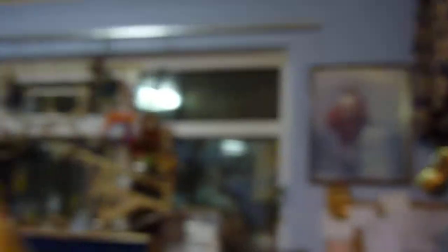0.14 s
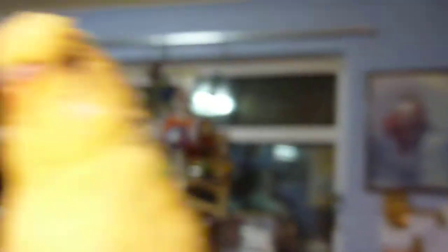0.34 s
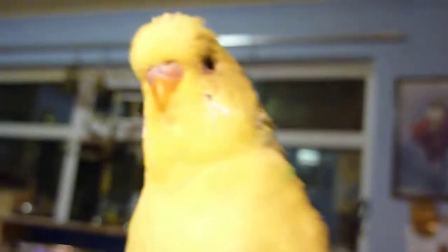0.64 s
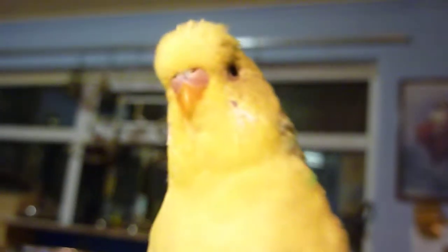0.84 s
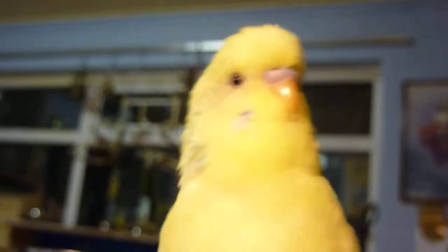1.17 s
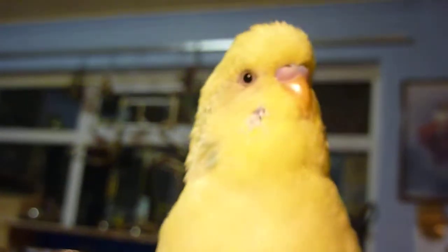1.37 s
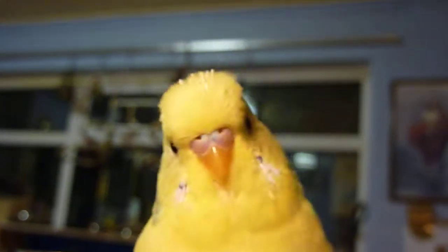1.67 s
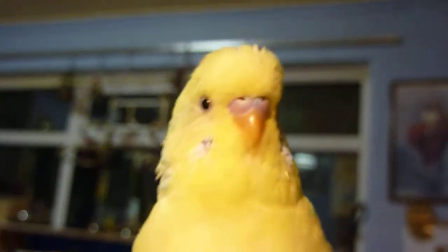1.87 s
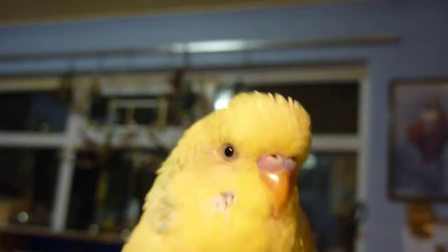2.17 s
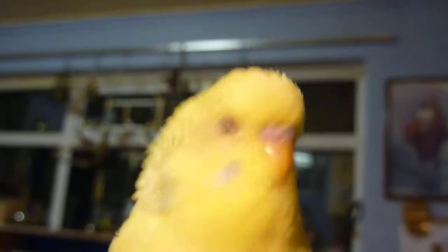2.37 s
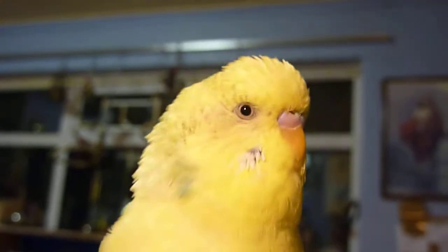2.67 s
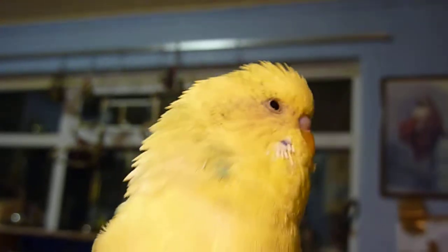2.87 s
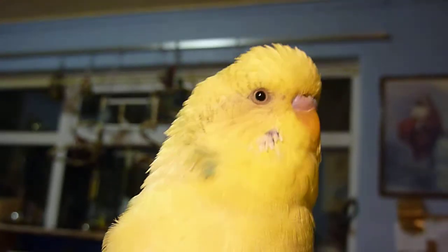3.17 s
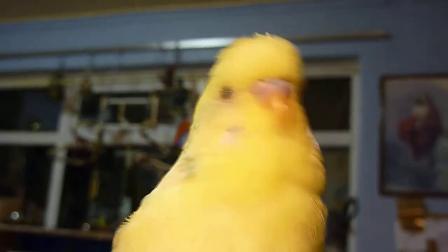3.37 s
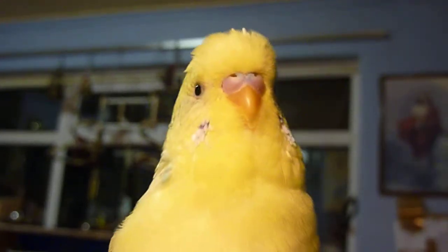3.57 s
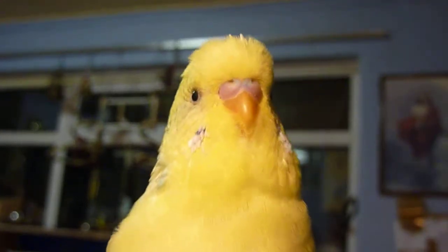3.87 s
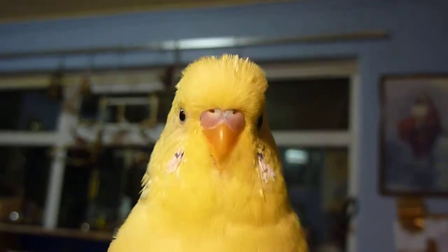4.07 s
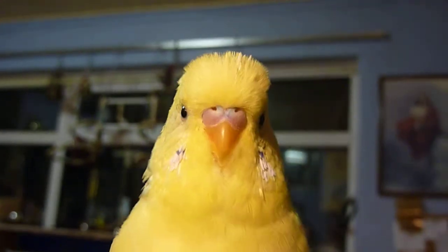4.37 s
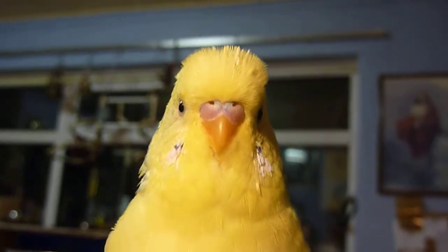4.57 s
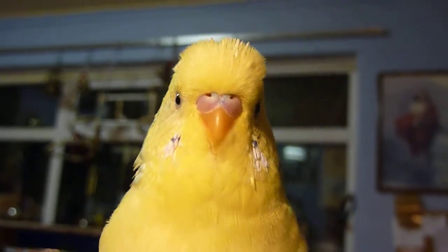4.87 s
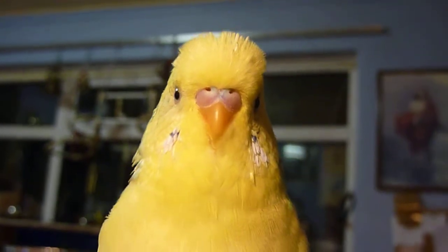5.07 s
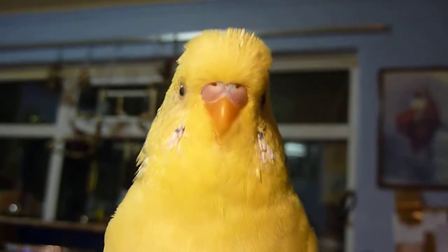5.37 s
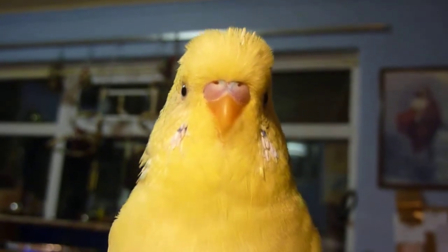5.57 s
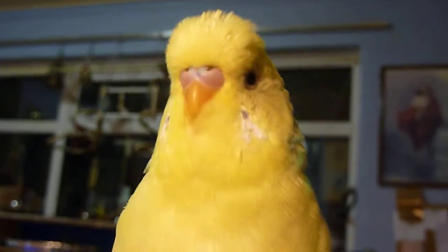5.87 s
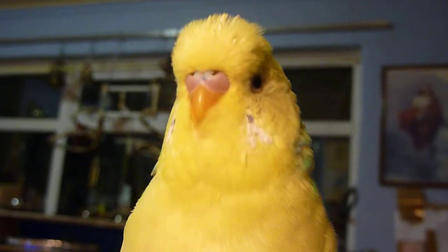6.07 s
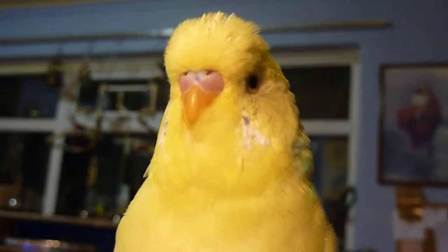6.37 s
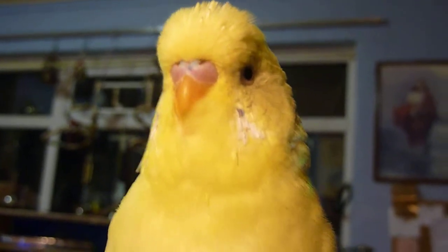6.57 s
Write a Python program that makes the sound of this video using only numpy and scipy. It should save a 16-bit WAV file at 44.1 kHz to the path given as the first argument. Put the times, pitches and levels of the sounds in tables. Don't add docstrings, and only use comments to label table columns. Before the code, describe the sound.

A small pet parrot close to the microphone clicks its beak, gives one brief raspy chirrup, then snaps in a steady run over faint hum.

```python
import sys
import numpy as np
from scipy import signal
from scipy.fft import rfft, irfft
from scipy.io import wavfile
from scipy.ndimage import uniform_filter1d, map_coordinates

SR = 44100
rng = np.random.default_rng(int(sys.argv[2]) if len(sys.argv) > 2 else 0)


def digitize_waveform(pressure):
    field = np.atleast_2d(pressure).T
    bounded = np.clip(field, -1, 1)
    quanta = np.round(bounded * 32767).astype(np.int16)
    wavfile.write(sys.argv[1], SR, quanta)


def volts_from_db(level):
    exponent = np.asarray(level, float) / 20
    return 10 ** exponent


N = 296793
T = np.arange(N) / SR

# [t/s, left-port treble lead/dB, chest f/Hz, chest level/dB, horn edge level/dB]
POSTURES = [(0.705, 7.5, 850, -15, 5.5), (2.108, 7, 767, -7.5, 7), (2.704, 3.5, 900, -11.5, -4),
            (2.881, 3.5, 900, -14, -10), (3.869, 6, 654, -7.5, 35.5), (4.058, 7, 870, -13.5, 4),
            (4.216, 6, 827, -5.5, -4), (4.377, 7, 820, -7.5, -4), (4.531, 6.5, 1000, -17, -4.5),
            (4.701, 7.5, 908, -20, 1.5), (4.864, 7, 770, -21, -9), (5.032, 7, 760, -14.5, -1),
            (5.204, 8, 810, -14.5, 2.5), (5.375, 5.5, 910, -19, 3), (5.548, 7, 830, -17.5, -3),
            (5.725, 6.5, 630, -21.5, 3.5), (6.414, 9.5, 620, -5, 34.5), (6.599, 10, 971, -12, 29)]


def band(x, hz, width_hz):
    return signal.lfilter(*signal.iirpeak(hz, hz / width_hz, fs=SR), x)


def ring(t, hz, cycles, rise=0.3):
    return np.where(t < 0, np.exp(-(t * hz / rise) ** 2), np.exp(-np.abs(t) * hz / cycles))


def add(out, start_s, x):
    i = int(start_s * SR)
    out[i:i + len(x)] += x[:N - i]


def hum(wobble_db=1.5):
    # [t/s, f/Hz, rms level/dB]
    mains_line = [(0, 199.2, -51.5), (0.999, 197.7, -50), (2.5, 201.2, -51), (3.8, 200.3, -49),
                  (4.401, 198.6, -51.5), (4.701, 200.5, -57), (5.2, 200.1, -53), (6.002, 201.5, -52),
                  (6.73, 200.2, -48.5)]
    # [f/Hz, rms level/dB]
    steady_lines = [(68.2, -79), (100.2, -67), (102.35, -77), (134.3, -75), (136.4, -75), (204.7, -67),
                    (272.8, -61.5), (300.5, -65.5), (306.9, -72.5)]
    s, hz, db = np.transpose(mains_line)
    drift = np.repeat(rng.standard_normal(N // 3000 + 1), 3000)[:N]
    drift = uniform_filter1d(drift, 3000)
    phase = 2 * np.pi * np.cumsum(np.interp(T, s, hz)) / SR
    out = volts_from_db(np.interp(T, s, db) + wobble_db * drift) * np.sin(phase)
    start_phases = rng.uniform(0, 2 * np.pi, len(steady_lines))
    for (hz, db), start in zip(steady_lines, start_phases):
        out = out + volts_from_db(db) * np.sin(2 * np.pi * hz * T + start)
    return np.sqrt(2) * out


def air(level_db=-51):
    # [f/Hz, density level/dB per Hz]
    spectrum = [(25, -20.5), (60, -18.5), (130, -13.5), (240, 0), (310, -8.5), (371, -1.5), (533, -9),
                (700, -10), (1050, -16), (1710, -17.5), (1900, -22.5), (2760, -23), (5000, -31.5),
                (7500, -32.5)]
    # [f/Hz, likeness/0-1]
    likeness = [(60, 0.89), (120, 0.93), (250, 1), (500, 0.96), (1010, 0.82), (2060, 0.36), (4170, -0.1),
                (8460, 0)]
    # [f/Hz, left minus right level/dB]
    imbalance = [(60, -2), (100, 7), (180, -2.5), (310, -0.5), (540, 0.5), (940, 0.5), (1630, 4.5),
                 (2820, 4.0), (4880, 2.0), (8460, 1)]
    log_f = np.log(np.fft.rfftfreq(N, 1 / SR) + 1)

    def curve(table):
        hz, value = np.transpose(table)
        return np.interp(log_f, np.log(hz), value)

    db, lean = curve(spectrum), curve(imbalance)
    alike = np.clip(curve(likeness), 0, 1)
    shared, *own = rfft(rng.standard_normal((3, N)))
    mix = np.sqrt(alike) * shared + np.sqrt(1 - alike) * np.array(own)
    mix = mix / np.sqrt((1 + alike) / 2)
    out = irfft(mix * volts_from_db(db + np.array([lean, -lean]) / 2), N)
    out = signal.sosfiltfilt(signal.butter(16, 8750, fs=SR, output="sos"), out)
    return out * volts_from_db(level_db) / out.std()


def buzz(frame_hz=29.97):
    # [f/Hz, width/Hz, rms level/dB]
    bands = [(5030, 200, -93), (6000, 250, -94), (6720, 350, -86), (7290, 250, -88)]
    ticks = np.zeros(N)
    ticks[(np.arange(0.01, N / SR, 1 / frame_hz) * SR).astype(int)] = 1
    out = np.zeros(N)
    for hz, width_hz, db in bands:
        tone = band(band(ticks, hz, width_hz), hz, width_hz)
        out += volts_from_db(db) * tone / tone.std()
    return out


def strikes():
    # [t/s, peak level/dB, mouth f/Hz]
    lone_snaps = [(0.413, -43.5, 3000), (1.3085, -48, 1000), (1.3096, -48, 1000), (2.6925, -42, 2514),
                  (2.7535, -26, 2820), (2.7726, -32, 2430), (2.8385, -43, 3550), (2.863, -47, 3480),
                  (2.8847, -17.5, 2200), (3.8752, -35, 800), (4.0592, -21.5, 2030), (4.3822, -30, 1200),
                  (4.5363, -25, 1100), (4.6974, -22, 2530), (4.8608, -18, 2730), (5.0294, -30, 1390),
                  (5.2007, -25.5, 2300), (5.2064, -28, 2810), (5.3722, -16, 3100), (5.3735, -26.5, 3700),
                  (5.5448, -18.5, 2820), (5.7297, -27.5, 2200)]
    # [middle snap t/s, peak level/dB, mouth f/Hz, gap/ms, lean/dB (+ loud first, - loud last)]
    triple_snaps = [(0.70581, -19, 3340, 1.2, -2), (2.108, -27, 3100, 1.74, -9),
                    (2.8829, -17.5, 2730, 1.41, 8.5), (2.8905, -22, 2700, 1.04, 3),
                    (3.8692, -32, 1102, 1.7, -5.5), (4.0611, -14.5, 3100, 1.1, 0.5),
                    (4.2184, -23.5, 2780, 1.6, 0.5), (4.378, -19.5, 3250, 1.0, -4),
                    (4.53201, -17, 3200, 1.138, 1.5), (4.70211, -15, 3250, 1.3, 2.5),
                    (4.8656, -15, 3100, 1.2, 4.5), (5.03331, -19, 2800, 1.273, -3.5),
                    (5.20461, -19.5, 2480, 1.237, -3), (5.377, -14.5, 2620, 1.3, 5.5),
                    (5.5496, -16, 3000, 1.4, 0.5), (5.7267, -15.5, 2670, 1.8, 0.1),
                    (6.4156, -32.5, 1130, 1.4, 5), (6.5998, -26, 1130, 1.25, 1.5)]
    first_rebound, middle_rebound, last_rebound, lone_rebound, rattle_rebound = 0.42, 0.2, 0.15, 0.1, 0.4
    flank_db, closing = -4.5, 0.837
    rows = [(*row, lone_rebound) for row in lone_snaps]
    for s, db, hz, gap_ms, lean_db in triple_snaps:
        gap_s = gap_ms / 1000
        rows += [(s - gap_s, db + flank_db + lean_db, hz, first_rebound),
                 (s, db, hz, middle_rebound),
                 (s + closing * gap_s, db + flank_db - lean_db, hz, last_rebound)]

    s, gap_s, hastens = 2.6982, 0.0033, 0.95
    first_db, swell_db, first_hz, narrows = -23.5, 2, 2030, 0.99
    bounce_s, bounce_db = 0.0009, -11
    for k in range(5):
        db = first_db + swell_db * min(k, 6 - k)
        hz = first_hz * narrows ** k
        rows += [(s, db, hz, rattle_rebound), (s + bounce_s, db + bounce_db, hz, last_rebound)]
        s += gap_s * hastens ** k
    return rows


def snaps(mouth_cycles=0.2, chest_cycles=1.1, edge_hz=6000, edge_cycles=1.04, gain_db=2.0, crack_db=-3):
    lead_in_s, rebound_spread = 0.001, 0.12
    out, t = np.zeros(N), np.arange(500) / SR - lead_in_s
    postures, rows = np.array(POSTURES), strikes()
    for (s, db, hz, swing), spread in zip(rows, rng.standard_normal((len(rows), 3))):
        nearest = np.argmin(abs(postures[:, 0] - s))
        _, _, chest_hz, chest_db, shine_db = postures[nearest]
        rebound = np.clip(swing + rebound_spread * spread[2], 0, 1)
        swell = ring(t - rebound / hz / 2, hz, mouth_cycles + rebound, 0.21 + 0.3 * rebound)
        body = np.cos(2 * np.pi * hz * t) * swell
        chest = np.sin(2 * np.pi * chest_hz * t - 0.6) * ring(t, chest_hz, chest_cycles, 0.35)
        edge_db = -10.5 + 13.5 * np.log2(hz / 2640) + shine_db
        tick_hz = edge_hz * (1 + 0.1 * spread[0])
        tick = np.cos(2 * np.pi * tick_hz * t) * ring(t, tick_hz, edge_cycles, 0.27)
        crack = np.cos(2 * np.pi * 8300 * t + spread[1]) * ring(t, 12000, 0.69, 0.47)
        edge = volts_from_db(edge_db) * tick + volts_from_db(edge_db + crack_db) * crack
        add(out, s - lead_in_s, volts_from_db(db + gain_db) * (volts_from_db(chest_db) * chest - body - edge))
    return out


def pips(rough=0.35, waver=0.05):
    # [t/s, length/ms, f/Hz, peak level/dB, glide ratio]
    click_pips = [(0.544, 1.5, 3100, -47, 1.2), (0.705, 3.2, 5210, -22.5, 1.8),
                  (0.706, 2.2, 6100, -19, 1.02), (2.107, 1.6, 4980, -28, 1.05),
                  (2.6499, 3.4, 3060, -40, 0.96), (2.8888, 4.9, 3460, -27.5, 0.996),
                  (3.8686, 2.0, 4500, -27, 1.15), (3.8705, 2.2, 6100, -25, 1.0),
                  (4.055, 3.5, 3650, -20.5, 1.18), (4.0612, 3.3, 3790, -22, 1.2),
                  (4.2157, 4, 3560, -24, 1.3), (4.3768, 2.9, 3680, -17, 1.056),
                  (4.5297, 2.9, 3364, -18, 1.36), (6.4125, 1.3, 5030, -25.5, 1.1),
                  (6.4141, 2.5, 4696, -20, 1.053), (6.598, 3.3, 4060, -18.5, 1.24)]
    # [t/s, length/ms, f/Hz, peak level/dB, glide ratio]
    chirrup_notes = [
        (2.4667, 13, 890, -37.5, 1.0),
        (2.716, 18, 880, -33, 1.1),
        (2.722, 6.9, 2110, -39, 1.2),
        (2.729, 13, 3870, -38.5, 0.89),
        (2.746, 10, 3382, -35.5, 0.62),
        (2.7515, 21, 880, -28.5, 1.34),
        (2.756, 8.2, 1950, -40, 0.87),
        (2.776, 21, 1220, -36, 1.04),
    ]
    out = np.zeros(N)
    whistles = click_pips + chirrup_notes
    knots = np.linspace(0, 1, 8)
    for (s, ms, hz, db, glide), wobble in zip(whistles, rng.standard_normal((len(whistles), 2, 8))):
        u = np.linspace(0, 1, int(ms * SR / 1000))
        swell, bend = (np.interp(u, knots, v) for v in wobble)
        if hz < 1500:
            shape = np.sin(np.pi * u ** 0.36) ** 1.4
        else:
            shape = np.sin(np.pi * u) ** 0.6 * (1 + rough * swell)
        pitch_hz = hz * glide ** u * (1 + waver * bend * (hz > 1500))
        phase = 2 * np.pi * np.cumsum(pitch_hz) / SR
        over_db = -25 - 11.5 * np.log2(hz / 1000)
        overtones = np.sin(2 * phase - 1.5) + 1.1 * np.sin(3 * phase - 3)
        add(out, s, volts_from_db(db) * shape * (np.sin(phase) + volts_from_db(over_db) * overtones))
    return out


def rasp(rate_hz=1300, jitter=0.35, scatter_db=3):
    # [t/s, level/dB, throat scale]
    course = [
        (2.713, -48, 0.87),
        (2.723, -54, 0.95),
        (2.733, -37.5, 1.05),
        (2.744, -35, .95),
        (2.755, -30, 0.82),
        (2.764, -44.5, 1.0),
        (2.772, -57, 0.7),
        (2.786, -53.5, 0.55),
    ]
    # [f/Hz, width/Hz, level/dB]
    throat = [(2100, 920, -5.5), (3100, 170, 2.5), (3910, 220, 1), (6700, 3900, -18)]
    s, db, scale = np.transpose(course)
    t = np.arange(s[0], s[-1], 1 / SR)
    chance = rng.standard_normal((300, 2))
    pulses = np.zeros(len(t) * 2)
    at = np.cumsum(SR / rate_hz * np.exp(jitter * chance[:, 0])).astype(int)
    inside = at < len(pulses)
    pulses[at[inside]] = volts_from_db(scatter_db * chance[inside, 1])
    voice = np.zeros(len(pulses))
    for k, (hz, width_hz, gain_db) in enumerate(throat):
        voice += (-1) ** k * volts_from_db(gain_db) * band(pulses, hz, width_hz)
    warped = np.cumsum(np.interp(t, s, scale))
    voice = map_coordinates(voice / voice.std(), [warped], order=3)
    out = np.zeros(N)
    add(out, s[0], voice * volts_from_db(np.interp(t, s, db)))
    return out


def room(x, wet_db=-22, t60_s=0.18, gap_s=0.0015):
    # [f/Hz, width/Hz, level/dB]
    cage = [(1000, 330, 0.5), (2780, 2900, 4.5), (4350, 980, 1.5), (5750, 3600, 1), (6100, 500, 7)]
    # [delay/ms, level/dB]
    echoes = [(1.55, -15), (4.1, -24), (8.4, -19)]
    t = np.arange(int(0.3 * SR)) / SR
    noise = rng.standard_normal((len(cage), 3, len(t)))
    tail = sum(volts_from_db(db) * band(n, hz, width_hz) for n, (hz, width_hz, db) in zip(noise, cage))
    tail = tail[2] + 0.63 * tail[:2]
    tail = tail * 1000 ** (-t / t60_s) * (1 - np.exp(-t / gap_s))
    tail *= volts_from_db(wet_db + np.array([[1.5], [-1.5]])) / np.sqrt(np.sum(tail[0] ** 2))
    for ms, db in echoes:
        tail[:, int(ms * SR / 1000)] += volts_from_db(db)
    return signal.fftconvolve(x[None], tail, axes=1)[:, :N]


def scene():
    high_pass = signal.butter(2, 350, "high", fs=SR, output="sos")
    bird = signal.sosfiltfilt(high_pass, snaps() + pips() + rasp())
    treble = volts_from_db(2.5) * band(bird, 5500, 3800)
    s, lead_db = np.transpose(POSTURES)[:2]
    lead = volts_from_db(np.interp(T, s, lead_db))
    side = treble * (lead - 1) / (lead + 1)
    return bird + np.array([side, -side]) + room(bird) + hum() + air() + buzz()


def band_limit(x):
    return signal.sosfilt(signal.butter(12, 9060, fs=SR, output="sos"), x)


def record(dry):
    # [f/Hz, width/Hz]
    notches = [(5430, 370), (7880, 280), (8120, 490)]
    x = signal.sosfiltfilt(signal.butter(6, 7600, fs=SR, output="sos"), dry)
    x = signal.sosfiltfilt(signal.butter(14, 9120, fs=SR, output="sos"), x)
    whine = volts_from_db(2) * band(band(x, 8000, 65), 8000, 65)
    for hz, width_hz in notches:
        x = x - band(x, hz, width_hz)
    return band_limit(x + whine)


dry = scene()
out = record(dry)
digitize_waveform(out)
```